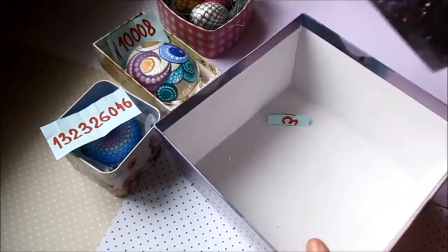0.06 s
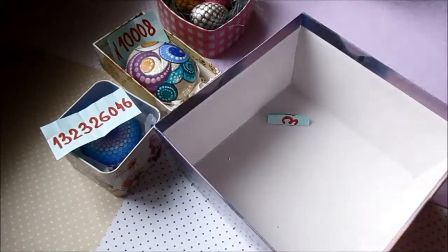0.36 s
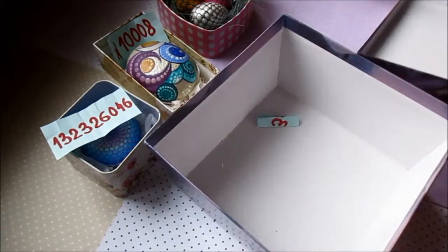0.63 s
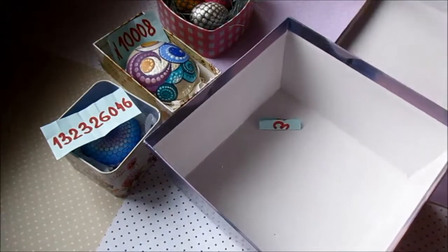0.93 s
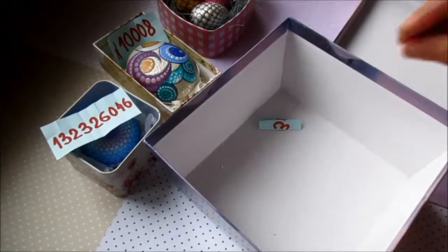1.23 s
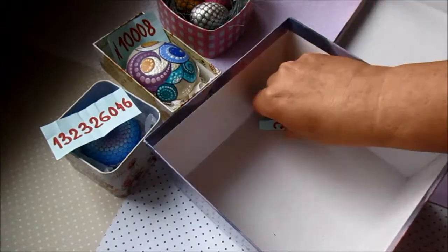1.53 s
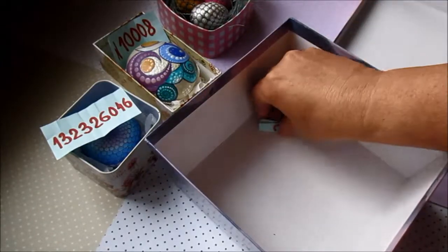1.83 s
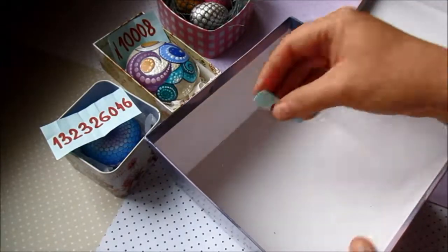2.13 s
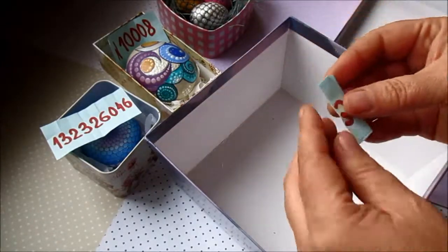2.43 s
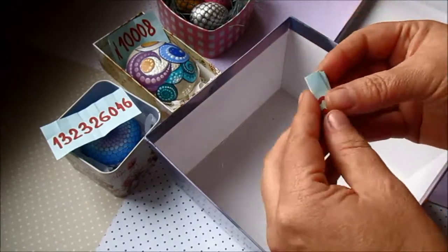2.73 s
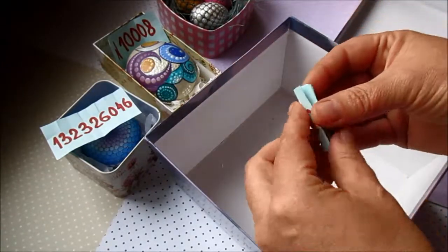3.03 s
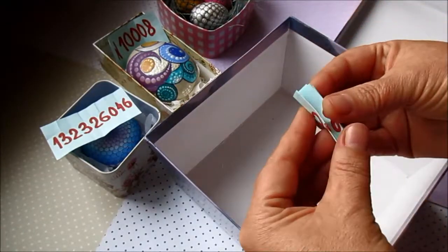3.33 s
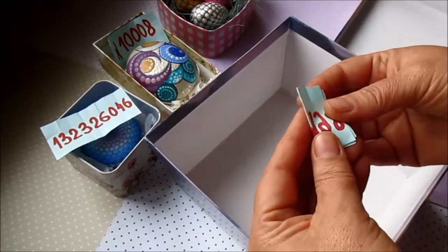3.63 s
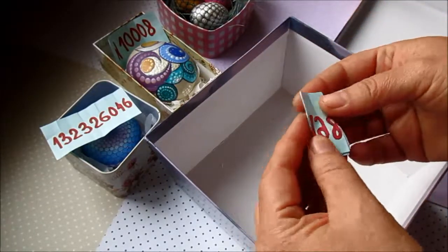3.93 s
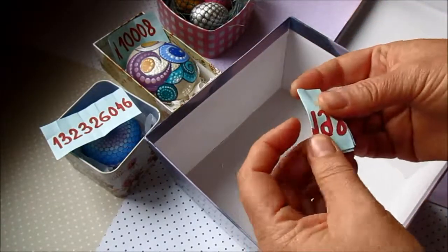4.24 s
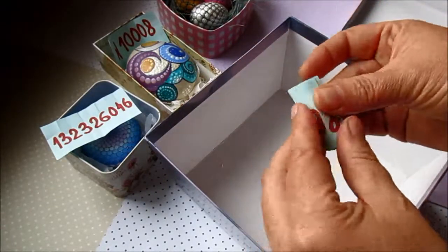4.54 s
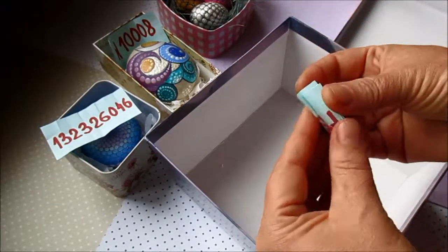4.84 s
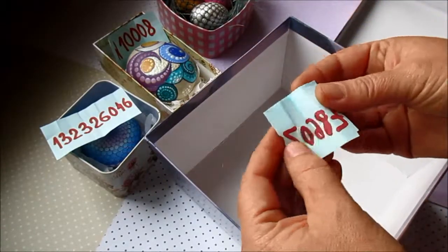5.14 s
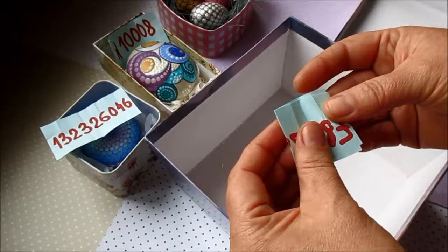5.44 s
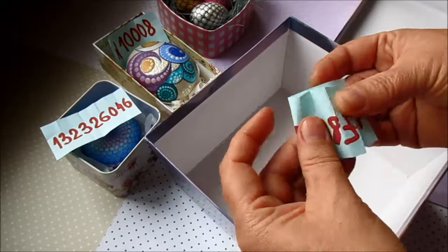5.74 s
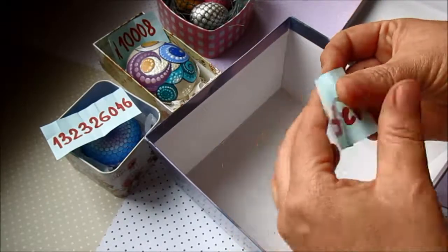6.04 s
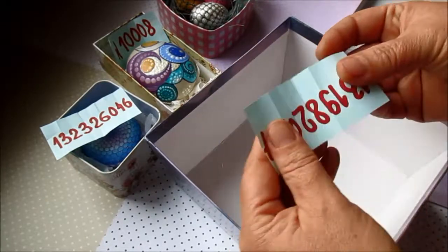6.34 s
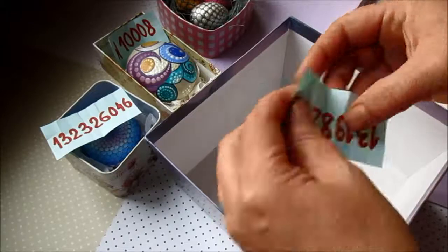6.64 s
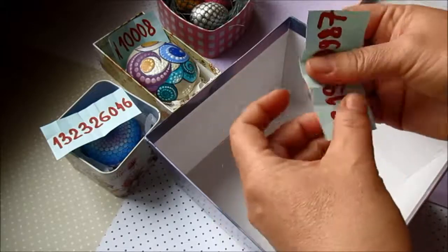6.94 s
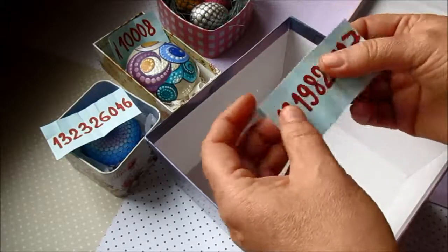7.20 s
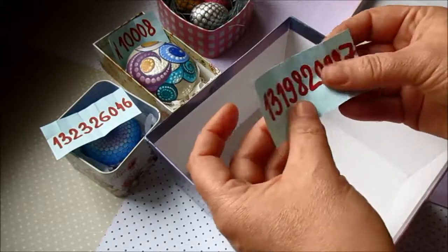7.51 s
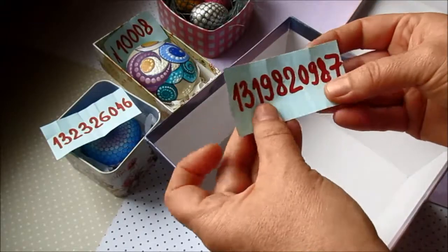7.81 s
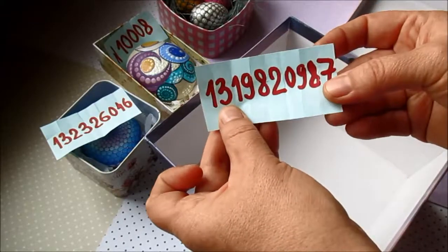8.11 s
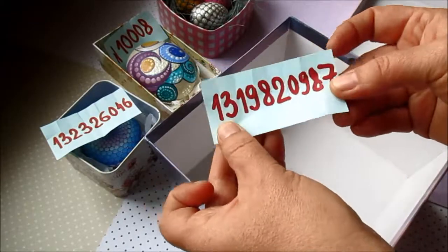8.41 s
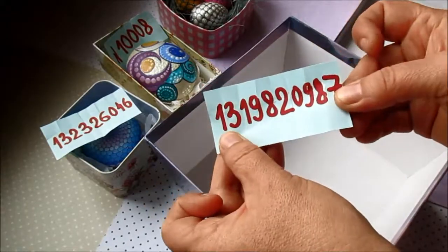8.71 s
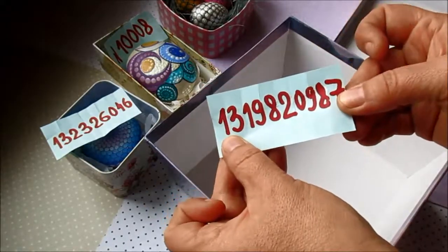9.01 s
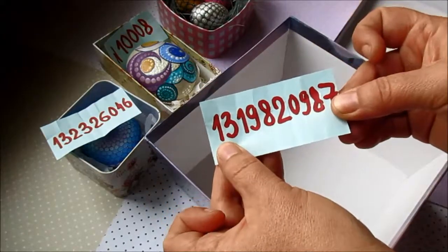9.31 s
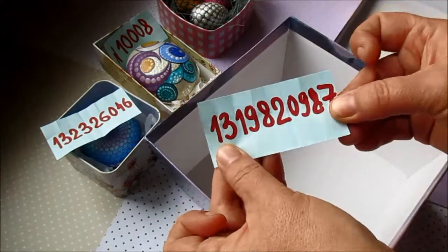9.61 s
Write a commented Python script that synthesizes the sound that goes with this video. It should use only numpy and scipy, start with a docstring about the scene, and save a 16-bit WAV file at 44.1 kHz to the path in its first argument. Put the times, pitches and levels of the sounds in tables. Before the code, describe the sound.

In a small room with a faint fan, card brushes and knocks twice as a box lid is put down. After a dull bump on the box, fingers rub a folded slip of paper close to the microphone, with two tiny squeaks. The paper opens in uneven rustles, ticks and crisp snaps, growing busier past the middle, then settles and leaves only the low room noise.

```python
"""A fan whirs in a small quiet room, and fingers brush over card with a hiss of sliding friction.
A cardboard lid is set down on a table in two hollow knocks, each impact ringing the modes of the card.
A hand bumps the box and picks out a folded paper slip. Fingers slide over it, squeak twice by stick-slip,
and open it fold by fold, its creases buckling and snapping close to the microphone.
After the sharpest snaps a limiter ducks the level and slowly recovers."""
import sys
import numpy as np
from scipy import signal
from scipy.fft import rfft, irfft
from scipy.io import wavfile
from scipy.ndimage import uniform_filter1d

SR = 44100
rng = np.random.default_rng(int(sys.argv[2]) if len(sys.argv) > 2 else 0)


def master_out(mix):
    """Clip the mix to full scale and print it as 16-bit PCM to the path in sys.argv[1]."""
    frames = np.transpose(np.atleast_2d(mix))
    ceiling = np.clip(frames, -1, 1)
    pcm = np.round(ceiling * 32767).astype(np.int16)
    wavfile.write(sys.argv[1], SR, pcm)


N = 426006

# Spectrum of the room's noise. Each row: frequency in Hz, relative level in dB.
AIR_SPECTRUM = [(20, -3), (60, -1), (120, -3.5), (170, -12), (330, -16), (700, -20.5), (1050, -15.5),
                (1300, -20), (1900, -23.5), (2250, -26.5), (3000, -27.5), (5000, -32), (9500, -33.5),
                (16000, -46)]
# Resonances of the fan. Each row: frequency in Hz, width in Hz, level in dB.
FAN_MODES = [(897, 40, -69.5), (1513, 138, -64.5), (1734, 128, -61)]
# Strokes of a finger or an edge on paper and card. Each row: start in seconds, length in seconds,
# fastest point as a share of the length, relative hiss level in dB, relative rustle level in dB.
STROKES = [(0.015, 0.2, 0.51, -70, -63), (0.201, 0.11, 0.54, -80, -66), (0.444, 0.128, 0.23, -62.0, -61.5),
           (0.529, 0.064, 0.22, -57.5, -53.0), (0.614, 0.15, 1, -72, -63), (0.741, 0.115, 1, -60, -54.5),
           (0.814, 0.171, 0.8, -58, -58), (1.655, 0.1, 0.74, -55, -52.5), (1.752, 0.143, 0.95, -58.5, -59),
           (1.92, 0.68, 0.14, -61.5, -72), (2.31, 0.21, 0.2, -61.5, -70), (2.652, 0.071, 0.22, -55, -59),
           (2.953, 0.15, 0.061, -56.5, -68), (3.104, 0.072, 0.63, -57, -75), (3.171, 0.089, 0.99, -63, -76),
           (3.299, 0.093, 0.8, -54, -53.5), (3.413, 0.079, 0.66, -49, -58), (3.515, 0.22, 0.11, -56, -62.5),
           (3.711, 0.16, 0.63, -53, -59), (3.884, 0.12, 0.29, -53, -61), (4.146, 0.012, 0.4, -50, -60),
           (4.177, 0.011, 0.2, -50, -60), (4.255, 0.12, 0.36, -52.5, -59),
           (4.361, 0.069, 0.26, -50.5, -51.5), (4.448, 0.079, 0.14, -48.5, -59),
           (4.531, 0.18, 0.068, -53.5, -54), (4.853, 0.027, 0.87, -49.5, -51.5),
           (4.891, 0.11, 0.74, -55, -56.5), (5.008, 0.182, 0.46, -56, -54),
           (5.175, 0.15, 0.71, -46.5, -48.5), (5.319, 0.13, 0.28, -52.5, -53.5),
           (5.516, 0.051, 0.69, -39.5, -42), (5.547, 0.21, 0.8, -42.5, -46),
           (5.741, 0.12, 0.77, -39, -44.5), (5.863, 0.038, 0.36, -41, -50),
           (5.932, 0.028, 0.35, -49, -49.5), (5.963, 0.036, 0.53, -47, -50),
           (6.014, 0.099, 0.41, -38.5, -41), (6.1, 0.12, 0.62, -39.5, -44),
           (6.207, 0.34, 0.46, -53.0, -54.5), (6.482, 0.18, 0.94, -47.5, -47.5),
           (6.735, 0.078, 0.22, -43.5, -47), (6.815, 0.076, 0.4, -54, -62),
           (6.927, 0.037, 0.66, -50, -55.5), (6.973, 0.33, 0.68, -48, -50), (7.27, 0.1, 0.59, -51, -53.0),
           (7.372, 0.133, 0.09, -49, -53), (7.492, 0.2, 0.4, -40.5, -44.0),
           (7.638, 0.25, 0.84, -53.0, -48.5), (7.8, 0.097, 0.64, -46.5, -53),
           (7.89, 0.14, 0.46, -48, -46.5), (8.008, 0.19, 0.36, -55, -52.5), (8.188, 0.072, 0.16, -52, -49),
           (8.361, 0.11, 0.061, -53.5, -51.5)]
# Friction spectra of the surface, a light touch and the moving sheet.
# Each row: frequency in Hz, relative level in dB.
HISS_SPECTRUM = [(2500, -39.5), (4500, -8), (5600, -4.5), (6800, -0.5), (8500, -3), (11000, -6),
                 (13500, -11.5), (16000, -23.5)]
WHISPER_SPECTRUM = [(6000, -29), (10000, -4.5), (12500, -2.5), (14500, -6.5), (16000, -22)]
RUSTLE_SPECTRUM = [(100, -11.5), (350, -7), (700, 2), (1200, -7), (1650, 2), (2200, -3.5), (3200, 2.5),
                   (4300, 0.5), (5500, -3), (8000, -20.5)]
# Resonances of the held sheet. Each row: frequency in Hz, width in Hz, relative level in dB.
SHEET_MODES = [(2673, 320, 1), (3430, 480, -5), (4220, 520, 1), (5140, 520, -1), (6830, 710, -2.5)]
# Flap, panel and crease of a typical tick. Each row: frequency in Hz, energy in dB above its drive.
TICK_MODES = [(620, 19), (1900, 25.5), (5500, 21.5)]
# Snaps of paper and card, ringing a loose flap, a stiff panel and the crease. Each row: start in seconds,
# then frequency in Hz and energy in dB for flap, panel and crease in turn.
SNAPS = [(0.4539, 1070, -24.5, 1180, -40, 4840, -24), (0.951, 700, -38, 2600, -33, 6200, -29),
         (1.5855, 490, -17, 1540, -13.5, 2660, -11.5), (1.5976, 606, -14.5, 1250, -21, 3270, -24),
         (1.651, 397, -27, 1190, -24, 3100, -34), (1.728, 690, -25, 1400, -26, 3500, -37),
         (1.8419, 1050, -32, 1500, -14, 4750, -15), (1.875, 960, -25, 1680, -27, 5640, -23.5),
         (3.3691, 730, -15.5, 1610, -12.5, 6450, -10), (3.4627, 754, -4, 1720, 2, 7070, 11),
         (3.549, 1060, -21, 2900, -35, 3550, -9), (4.0822, 485, -17.5, 630, -19, 9000, -27),
         (4.1764, 970, -30, 1580, -30, 8700, -21), (4.461, 1060, -38, 3350, -29, 4400, -6),
         (4.511, 530, -34, 1880, -21.5, 4030, -13.5), (4.5396, 310, -45, 2650, -26, 4960, -16.5),
         (4.6336, 980, -43, 2110, -26, 10170, -19), (4.9053, 740, -29, 1610, -26, 5500, -24),
         (4.9529, 567, -19, 2600, -11.5, 5860, -6), (5.1062, 487, -22, 1940, -26, 4410, -24),
         (5.4585, 460, -29.5, 3000, -26, 8500, -25), (5.7474, 830, -12, 1130, -43, 6620, -23),
         (5.7656, 666, -23, 2650, -22, 6490, -16), (5.8848, 830, -29, 2510, -30, 4400, -10.5),
         (5.8981, 840, -6, 2430, 1.5, 6340, 9), (5.998, 700, -14, 1380, -30, 3820, -19),
         (6.0655, 368, -12.5, 1670, -3.5, 5930, -0.5), (6.2585, 970, -33, 1720, -21, 4560, -20),
         (6.3358, 540, -26, 2220, -14, 2880, -36), (6.4473, 420, -19, 1700, -18, 3020, -25),
         (6.5589, 950, -34, 1780, -4.5, 5360, 0), (6.6084, 770, -20.5, 1780, -33, 6270, -29),
         (6.6554, 297, -19.5, 1700, -20, 7540, -15.5), (6.727, 710, -20, 1550, -19.5, 4740, -14),
         (6.74, 565, -20, 1810, -22, 6450, -17), (6.895, 390, -27, 2080, -24, 3340, -32),
         (7.1957, 260, -20.5, 2190, -21, 3730, -31), (7.306, 380, -17.5, 2310, -9.5, 3490, -26),
         (7.4994, 490, -14, 1600, -13.5, 3260, -32), (7.9927, 540, -10.5, 1770, -2.5, 2950, -5)]
# Impacts of cardboard. Each row: start in seconds, relative energy in dB, contact time in ms,
# number of contacts, mean time between them in ms, energy of the edge tick in dB, pitch factor.
KNOCKS = [(0.5668, -7.5, 1.62, 4, 6.8, -15.5, 0.98), (0.788, -5.5, 1.76, 6, 6.6, -17, 0.972),
          (1.586, -25, 0.33, 2, 12.4, -27, 1.0)]
# Modes of the hollow card. Each row: frequency in Hz, relative level in dB, 60 dB decay time in seconds.
CARD_MODES = [(78.4, -15, 0.22), (134, -12.5, 0.093), (181.5, -8.5, 0.087), (226, -4, 0.069),
              (276.3, -1.5, 0.12), (351, -6, 0.1), (434, -5.5, 0.077), (533, -7, 0.075), (624, -7.5, 0.04),
              (736, -9, 0.12), (850, 1, 0.061), (1170, -1, 0.027), (1510, 1, 0.031)]
# The lid or a hand bumping the box.
# Each row: start in seconds, energy in dB, frequency in Hz, 60 dB decay time in seconds.
BUMPS = [(0.791, -13, 88, 0.086), (1.59, -11, 76.6, 0.091), (1.5947, -15.5, 123, 0.12)]
# Fingertip squeaks. Each row: start in seconds, length in seconds, slip rate in Hz, rms level in dB.
SQUEAKS = [(3.122, 0.041, 2510, -63), (3.42, 0.044, 2500, -54)]


def undb(db):
    """Amplitude grows tenfold for every 20 dB."""
    return 10 ** (np.asarray(db) / 20)


def unit(x):
    """Normalisation to an rms of 1."""
    return x / np.sqrt(np.mean(x ** 2))


def energy(x, db):
    """Normalisation of a transient to a total energy in dB."""
    return x * undb(db) / np.sqrt(np.sum(x ** 2))


def add(out, start_s, x):
    """Superposition: x adds to out from start_s on."""
    i = int(start_s * SR)
    out[i:i + len(x)] += x[:len(out) - i]


def colour(x, spectrum):
    """Spectral shaping by a smooth curve, at an rms of 1."""
    hz, db = np.transpose(spectrum)
    bins_hz = np.maximum(np.fft.rfftfreq(len(x), 1 / SR), 1)
    gain = undb(np.interp(np.log(bins_hz), np.log(hz), db))
    return unit(irfft(rfft(x) * gain, len(x)))


def resonate(x, hz, width):
    """A second-order resonance with a gain of 1 at its centre."""
    return signal.lfilter(*signal.iirpeak(hz, hz / min(width, SR / 4), fs=SR), x)


def drift(rate_hz):
    """Low-pass noise: smooth random motion with an rms of 1."""
    size = max(int(SR / rate_hz), 1)
    steps = np.repeat(rng.standard_normal(N // size + 1), size)
    return unit(uniform_filter1d(uniform_filter1d(steps, size), size)[:N])


def fade(t, t60):
    """Exponential damping: 60 dB are lost in t60 seconds."""
    return np.exp(-np.log(1000) * t / t60)


def air_and_fan(air_db=-53.5, waver_db=1.2):
    """Broadband rumble and hiss fill the room; noise-driven resonances make the fan's wavering whir."""
    air = colour(rng.standard_normal(N), AIR_SPECTRUM) * undb(air_db)
    fan = 0
    for hz, width, db in FAN_MODES:
        band = resonate(rng.standard_normal(N), hz, width)
        fan += undb(db) * unit(resonate(band, hz, width))
    return air + fan * undb(waver_db * drift(6.8))


def whine(hz=15734, db=-86):
    """A pure tone, heard as a very faint electronic whistle."""
    return undb(db) * unit(np.sin(2 * np.pi * hz * np.arange(N) / SR))


def sliding_levels(held_s=(1.4, 8.45), held_db=(-70.5, -74.5), speed_exponent=0.84):
    """Friction noise grows as a power of speed; the strokes sum in power to hiss and rustle levels in dB."""
    t = np.arange(N) / SR
    held = (t > held_s[0]) & (t < held_s[1])
    power = np.outer(undb(held_db) ** 2, held)  # fingers holding the slip never lie quite still
    for start, length, fastest, *levels in STROKES:
        progress = np.arange(int(length * SR)) / SR / length
        travel = np.interp(progress, [0, np.clip(fastest, .02, .98), 1], [0, .5, 1])
        force = np.abs(np.sin(np.pi * travel)) ** speed_exponent
        for layer, db in zip(power, levels):
            add(layer, start, (undb(db) * force) ** 2)
    return 10 * np.log10(power + 1e-12)


def friction(grains_per_s=2300, spread_db=2.5, smooth=0.98, stutter_db=1.0):
    """Sliding friction: fibres catch and let go in dense, uneven clicks over a smooth hiss."""
    catches = rng.random(N) < grains_per_s / SR
    sizes = undb(spread_db * np.minimum(rng.exponential(size=N), 6))
    grains = unit(catches * sizes * rng.choice([-1, 1], N))
    return (grains + smooth * rng.standard_normal(N)) * undb(stutter_db * drift(130))


def sheet_ring(bend=.025, grip_db=2.2):
    """Forced vibration: friction drives the sheet's modes, which waver as fingers bend and damp it."""
    out = 0
    for hz, width, db in SHEET_MODES:
        phase = 2 * np.pi * np.cumsum(hz * np.exp(bend * drift(4.4))) / SR
        gain = undb(db + grip_db * drift(9.9))
        out += gain * (drift(width) * np.cos(phase) + drift(width) * np.sin(phase))
    return unit(out)


def crackle(per_s=25, size=0.89, t60=0.047):
    """Amplitude modulation: when a fibre holds longer and lets go, the friction jumps and dies away."""
    jumps = (rng.random(N) < per_s / SR) * np.minimum(rng.exponential(size=N), 2)
    decay = fade(np.arange(SR // 20) / SR, t60)
    return unit(1 + size * signal.fftconvolve(jumps, decay)[:N])


def rubbing(hiss_db, rustle_db, lightness=0.48, echo=0.3, echo_s=0.000603, sway=0.28):
    """Friction noise of skin on paper is comb-filtered by its reflection from the moving hands."""
    hiss = colour(friction(), HISS_SPECTRUM) * undb(hiss_db - 0.65)
    # a light touch hardly moves the sheet and whispers in the highest treble
    whisper_db = hiss_db - 14 + lightness * np.clip(hiss_db - rustle_db, 0, 14)
    whisper = colour(friction(), WHISPER_SPECTRUM) * undb(whisper_db)
    rustle = colour(friction(), RUSTLE_SPECTRUM) * undb(rustle_db - 0.07)
    ring = sheet_ring() * undb(rustle_db - 6)
    direct = (hiss + whisper + rustle + ring) * crackle()
    n = np.arange(N)
    lag = SR * echo_s * np.exp(sway * drift(4))
    return direct + echo * np.interp(n - lag, n, direct)


def buckle(modes, mode_q=(2.13, 3.3, 2.04), skirt=1.3, slip_t60=0.009, flutter_t60=0.068):
    """Buckling: an impulse, then slipping fibres and flutter, ring flap, panel and crease (Hz, dB each)."""
    t = np.arange(SR // 16) / SR
    slips, flutter = rng.standard_normal((2, len(t)))
    force = 0.23 * slips * fade(t, slip_t60) + energy(flutter * fade(t, flutter_t60), db=-14)
    force[0] += 1
    ring = 0
    for (hz, db), q in zip(modes, mode_q):
        mode = resonate(force, hz, hz / q)
        ring += energy(resonate(mode, hz, skirt * hz), db)  # a small sheet radiates little off resonance
    crease_db = modes[2, 1]
    fibre_crack = energy(resonate(force, hz=9740, width=3700), crease_db - 18)
    return ring + fibre_crack


def ticks(rustle_db, per_s=13, spread_db=1.0, spread_octaves=0.33, max_drive_db=-51):
    """Small wrinkles buckle at random, louder as the sheet moves harder, up to what a wrinkle can hold."""
    out = np.zeros(N)
    hz, db = np.transpose(TICK_MODES)
    for when, *chance in rng.random((int(per_s * N / SR), 7)):
        pitch, size = np.reshape(chance, (2, 3)) * 2 - 1
        drive_db = min(rustle_db[int(when * N)], max_drive_db)
        modes = np.column_stack([hz * 2 ** (spread_octaves * pitch), db + drive_db + spread_db * size])
        add(out, when * N / SR, buckle(modes))
    return out


def snaps():
    """Folds give way one after another, each releasing its elastic energy at once."""
    out = np.zeros(N)
    for start, *modes in SNAPS:
        add(out, start, buckle(np.reshape(modes, (3, 2))))
    return out


def knocks(rebound=0.71, scatter=0.061, boost_db=9, tick_t60=0.036):
    """Impact excitation: card chatters on the table or a knuckle, and each contact rings its modes."""
    out, t = np.zeros(N), np.arange(SR // 3) / SR
    for start, db, contact_ms, contacts, gap_ms, tick_db, pitch in KNOCKS:
        # neighbouring modes move the card in opposite directions; the grip shifts their pitch a little
        ring = sum((-1) ** k * undb(mode_db) * np.cos(2 * np.pi * hz * pitch * t) * fade(t, t60)
                   for k, (hz, mode_db, t60) in enumerate(CARD_MODES))
        force = np.zeros(len(t))
        for k in range(contacts):
            onset_ms = gap_ms * (k + scatter * rng.standard_normal())
            progress = np.clip((t * 1000 - onset_ms) / contact_ms, 0, 1)
            force += rebound ** k * np.sin(np.pi * progress)
        add(out, start, energy(signal.fftconvolve(force, ring)[:len(t)], db + boost_db))
        edge_tick = resonate(rng.standard_normal(len(t)), hz=1000, width=1400) * fade(t, tick_t60)
        add(out, start, energy(edge_tick, tick_db))
    return out


def bumps():
    """Damped oscillation: a soft push moves a whole wall of card in a low, short thud."""
    out, t = np.zeros(N), np.arange(SR // 4) / SR
    for start, db, hz, t60 in BUMPS:
        add(out, start, energy(np.sin(2 * np.pi * hz * t) * fade(t, t60), db))
    return out


def squeaks(jitter=.035, overtone_db=-1):
    """Stick-slip: a fingertip catches on the paper almost periodically, giving three harmonics."""
    out = np.zeros(N)
    for start, length, hz, db in SQUEAKS:
        size = int(length * SR)
        phase = 2 * np.pi * np.cumsum(hz * (1 + jitter * drift(810)[:size])) / SR
        tone = sum(undb(overtone_db * k) * np.sin(k * phase) for k in range(1, 4))
        add(out, start, unit(tone * np.hanning(size)) * undb(db))
    return out


def room(x, wet_db, t60):
    """Reverberation: reflections from furniture and walls add a short, dull tail."""
    t = np.arange(SR // 3) / SR
    noise = colour(rng.standard_normal(len(t)), [(100, 12), (600, 9), (3000, 1.0), (14000, -1.5)])
    tail = energy(noise * fade(t, t60) * (t > .004), wet_db)
    return x + signal.fftconvolve(x, tail)[:N]


def scene():
    """The reverberant share grows with distance: the box lies further off than the paper."""
    hiss_db, rustle_db = sliding_levels()
    paper = rubbing(hiss_db, rustle_db) + ticks(rustle_db) + snaps() + squeaks()
    near = room(paper, wet_db=-22.0, t60=0.088)
    far = room(knocks() + bumps(), wet_db=-13.5, t60=0.24)
    return (air_and_fan() + whine() + near + far)[None]


def record(dry, ceiling=0.6, release_s=0.66, notch=0.7, lift=0.12, cutoff_hz=16000):
    """Peak limiting follows a microphone with a treble notch and peak; a steep low-pass comes last."""
    x = dry[0]
    mic = x - notch * resonate(x, hz=7880, width=330) + lift * resonate(x, hz=9340, width=460)
    # the peak detector jumps up at once and leaks away exponentially
    leak = np.arange(N) / SR / release_s
    log_level = np.log(np.maximum(np.abs(mic), ceiling))
    peak = np.exp(np.maximum.accumulate(log_level + leak) - leak)
    low_pass = signal.ellip(8, .2, 70, cutoff_hz, fs=SR, output="sos")
    return signal.sosfilt(low_pass, mic * ceiling / peak)[None]


dry = scene()
out = record(dry)
master_out(out)
```